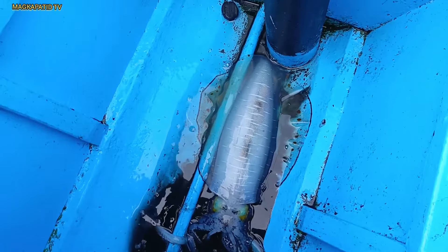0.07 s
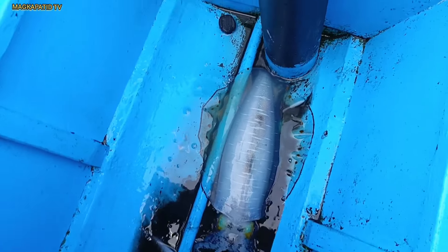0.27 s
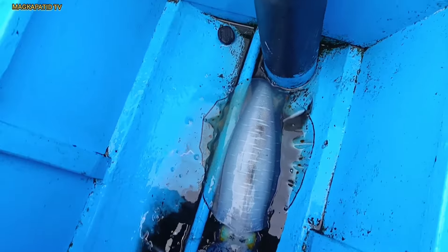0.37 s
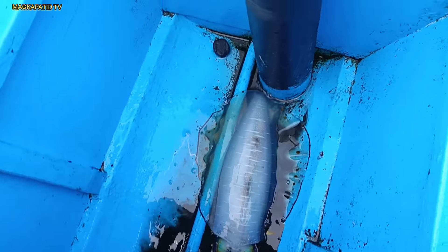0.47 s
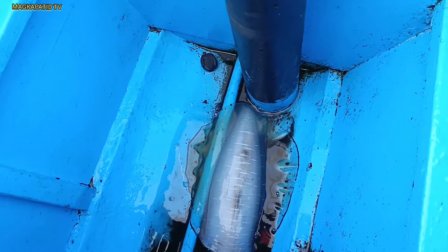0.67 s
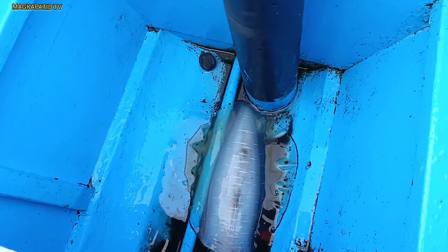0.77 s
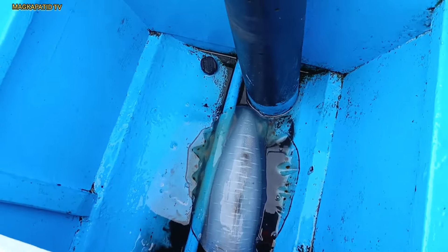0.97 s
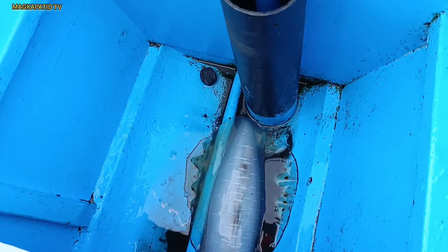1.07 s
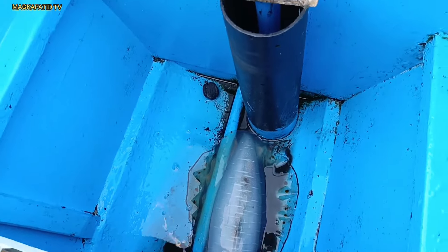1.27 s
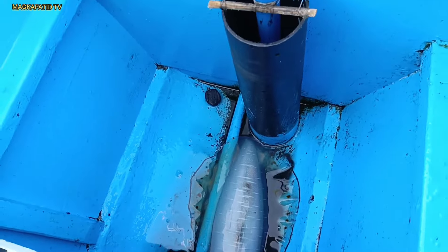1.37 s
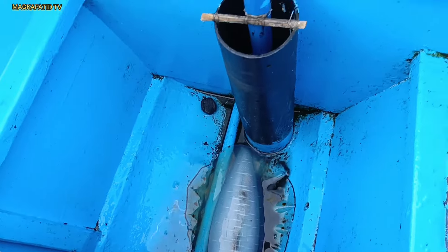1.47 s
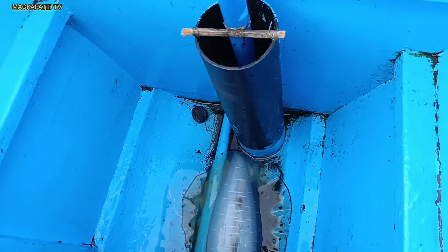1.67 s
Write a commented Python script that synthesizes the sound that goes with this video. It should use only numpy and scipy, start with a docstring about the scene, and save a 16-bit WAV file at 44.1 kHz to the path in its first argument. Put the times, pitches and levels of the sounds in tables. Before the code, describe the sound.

Close inside a small boat at sea: quiet trickling and low wash, one loud woody knock almost at once, a cluster of gurgling slops midway, then two muffled low thumps and crisp little drips at the end.

```python
"""Bottom of a small boat, microphone close above the water; 1.7 s of trickle (bubble grains and noise) and low wash.
A faint touch on the hull and single bubbles (dying sines) come first, then slops and droplets (shaped noise).
At 0.2 s a hard knock rings the hull modes and clatters the boards; slops crowd together near 0.7 s.
Soft thumps follow from 1.3 s, and the brightest droplets fall near the end.
The recorder's gain control pushes the trickle down after each heavy blow."""
import sys
import numpy as np
from scipy import signal
from scipy.fft import rfft, irfft
from scipy.io import wavfile
from scipy.ndimage import uniform_filter1d

SR = 44100
rng = np.random.default_rng(int(sys.argv[2]) if len(sys.argv) > 2 else 0)


def unload_wav(signal):
    """Save mono or channel-first audio to the path in sys.argv[1] as 16-bit WAV at rate SR, clipped to [-1, 1]."""
    wavfile.write(
        sys.argv[1],
        SR,
        np.round(np.clip(np.atleast_2d(signal).T, -1, 1) * 32767).astype(np.int16),
    )


N = 74970
T = np.arange(N) / SR  # time [s]

# steady trickle: (time [s], gurgle level [dB], fine fizz level [dB])
TRICKLE_LEVELS = [(0, -30, -43.5), (.18, -46.5, -51.5), (.27, -37, -49.5), (.41, -40, -51),
                  (.47, -34.5, -45.5), (.54, -39.5, -54), (0.649, -41, -48), (.8, -38.5, -46),
                  (.97, -40, -49.5), (1.15, -40, -46.5), (1.28, -38.5, -50.5), (1.37, -37, -45),
                  (1.451, -39, -58), (1.529, -41, -49.5), (1.6, -38, -42.5), (1.7, -37.5, -49)]
# colour of the trickle's gurgle: (frequency [Hz], relative level [dB per Hz])
TRICKLE_COLOUR = [(60, -43.5), (170, -1.5), (280, 2.5), (370, -0.5), (470, -7), (570, -3.5), (780, 3.5),
                  (1350, 0.5), (2050, -3.5), (2500, -9), (3200, -53), (6000, -66), (17000, -76)]
# colour of the trickle's fine fizz: (frequency [Hz], relative level [dB per Hz])
FIZZ_COLOUR = [(500, -54), (2000, 6), (2900, 1), (4000, -2.5), (5400, -0.5), (6500, -2.5), (7400, -12.5),
               (9200, -14.5), (11500, -36), (14000, -18), (15400, -6), (17000, -24)]
# low wash of the sea against the hull: (time [s], level [dB])
WASH_LEVELS = [(0, -26), (.12, -42), (.2, -31), (.5, -36), (.63, -47.5), (.74, -43.5), (.9, -51),
               (1.05, -51), (1.13, -47), (1.24, -68), (1.45, -34), (1.7, -46.5)]
# colour of the wash: (frequency [Hz], relative level [dB per Hz])
WASH_COLOUR = [(25, 15), (50, 13), (75, -2), (110, 14.5), (170, -7), (260, -19), (500, -46.5)]
# blows on the hull: (time [s], level [dB], contact corner [Hz],
#                     extra level of the two lowest modes [dB], clatter level [dB])
BLOWS = [(0.001, -33.5, 260, -3, -52), (0.2036, -3, 1115, 5.5, -7), (0.2102, -8, 900, 3, -11.5),
         (0.269, -18, 450, 2.5, -19), (0.743, -31, 302, -29, -52), (1.318, 0.5, 182, -13.5, -34.5),
         (1.386, -9, 230, -8, -30), (1.477, -31.5, 150, -12, -69)]
# ringing modes of the hull: (frequency [Hz], level [dB], t60 [s])
HULL_MODES = [(81.46, 1, 0.63), (82.9, -6.5, 0.8), (95, -4, 0.2), (112.9, -1, 0.32), (122.5, -8, 0.37),
              (174.6, -20.5, 0.43), (224.6, -13, 0.36), (254.6, -8.5, 0.36), (298, -6.5, .26),
              (318.9, -4, 0.21), (477, -14.5, 0.13), (517, -38, 0.18), (547, -12.5, 0.16), (556, -13, 0.18),
              (862.5, -10.5, 0.21)]
# colour of the clattering boards: (frequency [Hz], relative level [dB per Hz])
CLATTER_COLOUR = [(40, -55), (120, -7), (280, 6), (400, -5.5), (560, 11), (700, -0.5), (1000, -12),
                  (1150, 0.5), (1300, -13.5), (1500, 0), (1820, -8.5), (2100, -14.5), (3200, -24)]
# decay of the clatter: (frequency [Hz], t60 [s])
CLATTER_DECAY = [(100, 0.61), (550, 0.23), (1000, 0.22), (1800, 0.16), (6000, 0.032)]
# single bubbles: (time [s], frequency [Hz], level [dB], t60 [s])
BUBBLES = [(0.001, 170.4, -27.5, 0.14), (0.028, 139.7, -27, 0.092), (0.055, 1312, -32, 0.041),
           (0.089, 100, -19, 0.043), (0.190, 1690, -24.5, 0.02), (0.266, 4990, -40.5, 0.019),
           (0.553, 6060, -36, 0.0085), (0.672, 1040, -22, .05), (0.677, 1390, -21, .03),
           (0.678, 1170, -21, .03), (0.736, 262, -19.5, 0.083), (0.816, 3770, -32, 0.013),
           (0.822, 1700, -19, 0.024), (0.874, 890, -28, 0.016), (0.889, 610, -31, 0.019),
           (0.921, 2985, -37, .06), (0.947, 99.7, -20.5, 0.068), (1.008, 1010, -38, 0.21),
           (1.037, 1324, -31.5, 0.052), (1.062, 720, -35, .04), (1.096, 790, -35, .05),
           (1.561, 2037, -26.5, 0.029), (1.586, 2470, -20, 0.0074), (1.628, 920, -27.5, 0.02),
           (1.641, 2110, -29, 0.0084), (1.651, 2064, -25.5, 0.062)]
# slops of water: (time [s], rise [s], t60 [s], slosh level [dB], gurgle level [dB], spray level [dB])
SLOPS = [(0.128, 0.0067, 0.73, -41, -33.5, -43), (0.444, 0.0021, 0.32, -34.5, -49, -54.5),
         (0.459, .006, 0.45, -62, -49, -46), (0.561, 0.0064, 0.12, -41.5, -35.5, -58),
         (0.666, 0.0081, 0.19, -26, -20.5, -34), (0.689, 0.0016, 0.15, -29.5, -44, -33),
         (0.705, 0.0021, 0.097, -30.5, -29, -28), (0.734, 0.0046, 0.24, -28.5, -34.5, -57),
         (0.749, 0.0013, 0.07, -27.5, -24.5, -73), (0.806, 0.016, 0.48, -38.5, -40.5, -47),
         (0.87, 0.023, 0.16, -30, -51, -48), (0.912, 0.0043, 0.061, -58, -51, -29.5),
         (0.986, 0.0079, 0.2, -50, -39, -43), (1.005, .002, 0.31, -36, -35.5, -37.5),
         (1.023, 0.0053, 0.05, -73, -36.5, -58), (1.176, .01, 0.59, -57.5, -41, -44.5),
         (1.234, 0.009, 0.44, -55, -62, -50), (1.574, 0.0095, 0.055, -58, -52, -30.5),
         (1.637, 0.0047, 0.088, -38, -26.5, -33), (1.649, 0.0017, 0.18, -37, -35, -40.5)]
# colour of a slop's slosh: (frequency [Hz], relative level [dB per Hz])
SLOSH_COLOUR = [(40, -61), (130, -11), (260, 6.5), (430, -1), (680, 7), (900, -2), (1400, -34.5),
                (4000, -87)]
# colour of a slop's gurgle: (frequency [Hz], relative level [dB per Hz])
GURGLE_COLOUR = [(100, -42), (500, -45.5), (950, 15.5), (1450, 18), (2050, 15.5), (2500, -1.5), (3200, -32),
                 (8000, -76.5)]
# colour of a slop's spray: (frequency [Hz], relative level [dB per Hz])
SPRAY_COLOUR = [(300, -45), (1800, -5.5), (2800, 3.5), (4100, -5), (5400, 1.5), (6600, -3), (7400, -9),
                (9200, -12), (11500, -33), (14000, -12), (15400, -12.5), (17000, 8.5)]
# sharp droplets: (time [s], level [dB])
DROPS = [(0.135, -43), (0.583, -36), (0.707, -44), (0.916, -36), (1.038, -43), (1.130, -32), (1.562, -25),
         (1.586, -34), (1.639, -24.5), (1.650, -17.5), (1.670, -24.5)]
# colour of a droplet: (frequency [Hz], relative level [dB per Hz])
DROP_COLOUR = [(500, -36), (3000, -7.5), (6500, -7), (9000, -14.5), (11500, -53), (14000, -21), (15000, 2),
               (15700, 5.5), (17000, 8)]

# bubbles: the phase gains this share by t60 (the pitch climbs by twice as much); onset scale in cycles
BUBBLE_RISE, BUBBLE_ONSET_CYCLES = 0.089, 0.76
# froth: total grain rate, length setting in cycles, scale of the random level, power share of grains
GRAINS_PER_S, GRAIN_CYCLES, GRAIN_SPREAD_DB, GRAIN_SHARE = 5000, 11.3, 1.5, 0.8
LUMPY_DB, LUMP_S = 1.0, 0.078  # trickle surges: rms swing, smoothing length
SWELL_CYCLES, HULL_TOP_HZ = 2.4, 2580  # onset scale of the hull modes, low-pass on the whole hull
CLATTER_RISE_S = 0.002
DROP_T60_S = 0.027
WALLS_T60_S, WALLS_DB = 0.03, 4.5
LOW_CUT_HZ, EDGE_HZ = 73, 16000  # recorder's band
# gain control: threshold, share of the excess dB removed, averaging time, fall of the held level
LIMIT_DB, SQUEEZE, GRAB_S, RECOVER_DB_PER_S = -22, 0.42, 0.012, 36


def gain_of(db):
    """Decibels to gain."""
    return 10 ** (np.asarray(db) / 20)


def evened(x):
    """Scales to an rms of one."""
    return x / np.sqrt(np.mean(x ** 2) + 1e-20)


def read(points, hz):
    """Reads a table on a logarithmic frequency axis."""
    table_hz, value = np.transpose(points)
    return np.interp(np.log(hz + 1), np.log(table_hz + 1), value)


def coloured(x, spectrum):
    """Filters x by a spectrum, at an rms of one."""
    hz = np.fft.rfftfreq(len(x), 1 / SR)
    return evened(irfft(rfft(x) * gain_of(read(spectrum, hz)), len(x)))


def dulled(x, hz, order=2):
    """Low-pass filter."""
    return signal.sosfilt(signal.butter(order, hz, fs=SR, output="sos"), x)


def fade(t, t60):
    """Exponential decay by 60 dB in t60 seconds."""
    return np.exp(-np.log(1000) * t / t60)


def add(mix, start, sound):
    """Mixes a sound in at a time in seconds."""
    part = mix[max(round(start * SR), 0):][:len(sound)]
    part += sound[:len(part)]


def bubble(hz, t60):
    """Ringing trapped air: a dying sine that climbs a little in pitch."""
    t = T[:int(t60 * SR) + 2]
    onset = 1 - np.exp(-(t * hz / BUBBLE_ONSET_CYCLES) ** 2)
    cycles = hz * t * (1 + BUBBLE_RISE * t / t60)
    return onset * fade(t, t60) * np.sin(2 * np.pi * cycles)


def froth(count=64):
    """Many tiny bubbles of all sizes over smooth noise, roughly even across the spectrum."""
    grains = np.zeros(N)
    pitches = np.geomspace(250, 16000, count)
    for hz in pitches:
        chance, size = rng.random(N), rng.random(N)
        born = chance < GRAINS_PER_S / SR * np.sqrt(hz) / np.sqrt(pitches).sum()
        clicks = np.zeros(N)
        clicks[born] = gain_of(GRAIN_SPREAD_DB * np.minimum(-np.log(size[born]), 3.5))
        ringing = signal.oaconvolve(clicks, bubble(hz, 2 * GRAIN_CYCLES / hz + 0.006))[:N]
        grains += np.sqrt(hz) * evened(ringing)  # the weight evens out the logarithmic spacing
    smooth = rng.standard_normal(N)
    return np.sqrt(GRAIN_SHARE) * evened(grains) + np.sqrt(1 - GRAIN_SHARE) * smooth


def trickle():
    """Water runs over the boards in small uneven surges, gurgling and fizzing."""
    lumps = uniform_filter1d(rng.standard_normal(N), int(LUMP_S * SR))
    lumps = evened(uniform_filter1d(lumps, int(LUMP_S * SR / 2)))
    lapping = dulled(rng.standard_normal(N), 250)
    water = froth() + lapping
    times, gurgle_db, fizz_db = np.transpose(TRICKLE_LEVELS)
    gurgle = coloured(water, TRICKLE_COLOUR) * gain_of(np.interp(T, times, gurgle_db))
    fizz = coloured(water, FIZZ_COLOUR) * gain_of(np.interp(T, times, fizz_db))
    return (gurgle + fizz) * gain_of(LUMPY_DB * lumps)


def wash():
    """The sea laps dully at the outside of the hull: low noise of varying level."""
    level_db = np.interp(T, *np.transpose(WASH_LEVELS))
    return coloured(rng.standard_normal(N), WASH_COLOUR) * gain_of(level_db)


def clatter(size=24576):
    """Dense small resonances of the boards, as noise whose treble dies first."""
    noise = coloured(rng.standard_normal(size), CLATTER_COLOUR)
    hz, t, bands = signal.stft(noise, SR, nperseg=256)
    decaying = bands * fade(t, read(CLATTER_DECAY, hz)[:, None])
    return signal.istft(decaying, SR)[1] * np.minimum(T[:size] / CLATTER_RISE_S, 1)


def hull():
    """Blows ring the hull, whose two lowest modes beat; a soft contact starts slowly and favours low modes."""
    out, t = np.zeros(N), T[:SR]
    rings = []
    for hz, db, t60 in HULL_MODES:
        swell = 1 - np.exp(-t * hz / SWELL_CYCLES)
        rings.append(gain_of(db) * fade(t, t60) * np.sin(2 * np.pi * hz * t) * swell)
    lowest_pair = np.arange(len(HULL_MODES)) < 2
    for start, db, corner_hz, lowest_db, clatter_db in BLOWS:
        weights = gain_of(db + lowest_db * lowest_pair)
        add(out, start, dulled(weights @ np.array(rings), corner_hz, order=3))
        add(out, start, gain_of(clatter_db) * clatter())
    return dulled(out, HULL_TOP_HZ, order=4)


def bubbles():
    """Larger pockets of trapped air, each ringing at its own pitch."""
    out = np.zeros(N)
    for start, hz, db, t60 in BUBBLES:
        add(out, start, gain_of(db) * bubble(hz, t60))
    return out


def slops():
    """Each slop swells quickly and drains away as slosh, gurgle and spray."""
    water, out = froth(), np.zeros(N)
    colours = (SLOSH_COLOUR, GURGLE_COLOUR, SPRAY_COLOUR)
    voices = np.array([coloured(water, colour) for colour in colours])
    for start, rise, t60, *levels_db in SLOPS:
        swell = np.clip((T - start) / rise, 0, 1)
        drain = fade(np.maximum(T - start - rise, 0), t60)
        out += swell * drain * (gain_of(levels_db) @ voices)
    return out


def drops(size=4096):
    """Droplets land with a thin, very high tick: short bursts of coloured noise."""
    out = np.zeros(N)
    for start, db in DROPS:
        tick = coloured(rng.standard_normal(size), DROP_COLOUR) * fade(T[:size], DROP_T60_S)
        add(out, start, gain_of(db) * tick)
    return out


def walls(x, size=6000):
    """Short, dense reflections between the sides of the boat, starting after 2 ms."""
    tail = rng.standard_normal(size) * fade(T[:size], WALLS_T60_S) * (T[:size] > 0.002)
    return x + gain_of(WALLS_DB) * signal.oaconvolve(x, tail / np.linalg.norm(tail))[:N]


def scene():
    """Water and hull, heard from just above; only bubbles and droplets reflect off the sides."""
    return (trickle() + wash() + hull() + walls(bubbles() + drops()) + slops())[None]


def record(dry):
    """Low cut; gain control that grabs quickly and lets go slowly; upper band limit."""
    x = signal.sosfilt(signal.butter(4, LOW_CUT_HZ, "high", fs=SR, output="sos"), dry[0])
    r = np.exp(-1 / (GRAB_S * SR))
    power_db = 10 * np.log10(signal.lfilter([1 - r], [1, -r], x ** 2) + 1e-12)
    fall = T * RECOVER_DB_PER_S
    held_db = np.maximum.accumulate(power_db + fall) - fall  # peaks held, falling steadily
    over_db = np.maximum(held_db - LIMIT_DB, 0)
    ducked = x / gain_of(SQUEEZE * over_db)
    band_limit = signal.firwin(401, EDGE_HZ, window=("kaiser", 8), fs=SR)
    return signal.oaconvolve(ducked, band_limit, "same")[None]


dry = scene()
out = record(dry)
unload_wav(out)
```